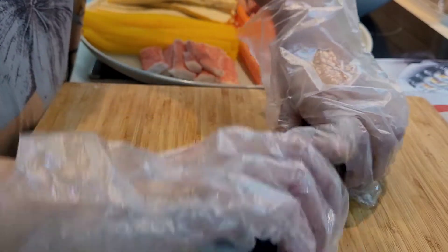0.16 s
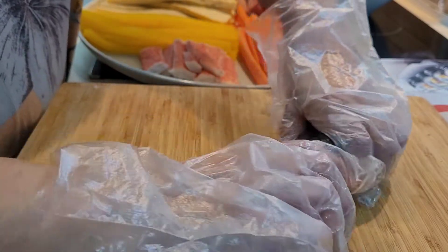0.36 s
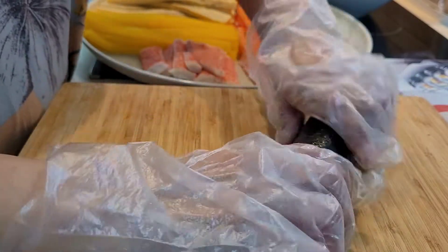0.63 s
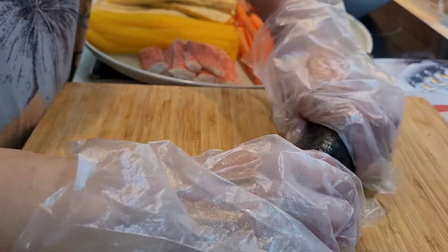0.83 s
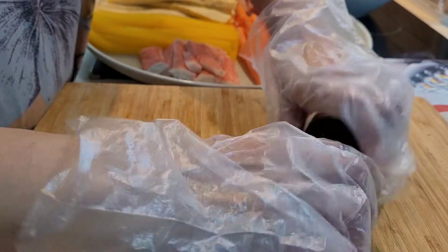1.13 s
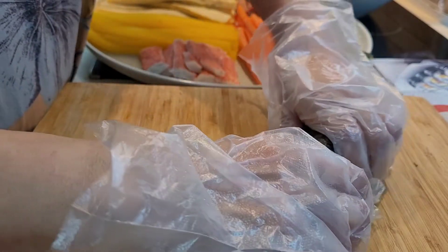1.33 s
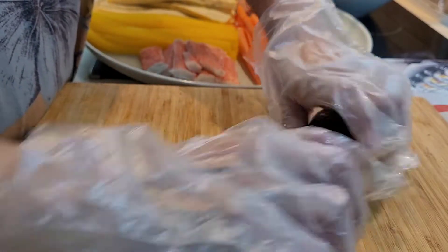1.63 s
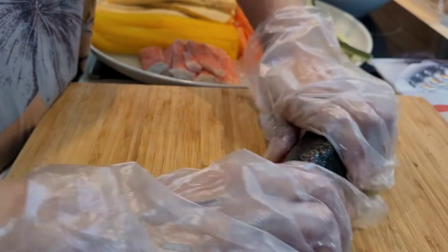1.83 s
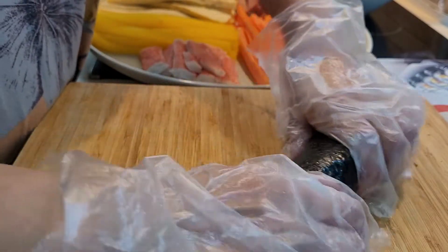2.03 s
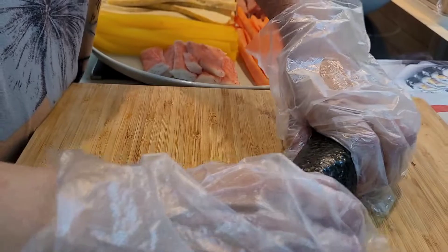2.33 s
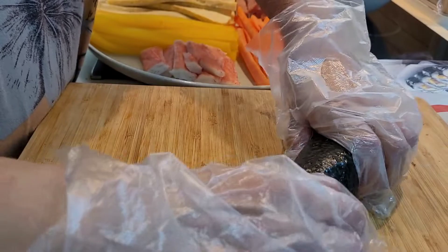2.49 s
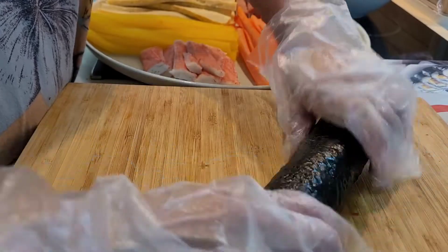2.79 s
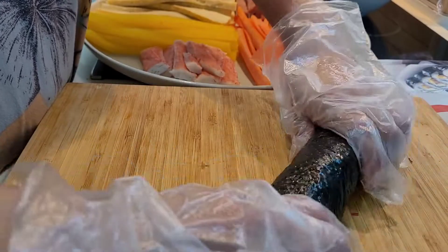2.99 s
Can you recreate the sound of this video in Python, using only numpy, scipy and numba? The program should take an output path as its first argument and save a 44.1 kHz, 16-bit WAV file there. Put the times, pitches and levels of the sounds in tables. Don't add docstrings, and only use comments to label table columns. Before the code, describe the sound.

Close stereo pickup of disposable gloves rustling brightly as hands press a food roll, swelling and easing several times a second, with stray crisp snaps, dull palm thuds and quiet kitchen rumble.

```python
import sys
import numpy as np
from scipy import signal
from scipy.fft import rfft, irfft
from scipy.io import wavfile
from scipy.ndimage import uniform_filter1d, map_coordinates
from numba import njit

SR = 44100
rng = np.random.default_rng(int(sys.argv[2]) if len(sys.argv) > 2 else 0)


def materialize(psi):
    bounded = np.clip(np.atleast_2d(psi).T, -1, 1)
    quanta = np.round(bounded * 32767).astype(np.int16)
    wavfile.write(sys.argv[1], SR, quanta)


def attenuation_scalar(level_db):
    decades = np.asarray(level_db, float) / 20
    return 10 ** decades


N = 138915

LAG_S = .00007


def shape(x, points):
    hz, db = np.array(points, float).T
    f = np.arange(N // 2 + 1) * SR / N
    gain = attenuation_scalar(np.interp(np.log(f + 1), np.log(hz + 1), db))
    return irfft(rfft(x) * gain, N)


def band(x, hz, width):
    return signal.lfilter(*signal.iirpeak(hz, hz / width, fs=SR), x)


def unit(x):
    return x / np.sqrt(np.mean(x ** 2))


def walk(rate):
    hold = int(SR / rate)
    levels = rng.standard_normal(size=512)[np.arange(N) // hold]
    return unit(uniform_filter1d(levels, hold))


@njit
def ring(at, turn, decay, size, n):
    out = np.zeros(n + 4000)
    for k in range(len(at)):
        i = int(at[k]) + 1
        d = i - at[k]
        r = np.exp(-decay[k])
        now = size[k] * np.exp(-decay[k] * d) * np.sin(turn[k] * d)
        last = size[k] * np.exp(-decay[k] * (d - 1)) * np.sin(turn[k] * (d - 1))
        c = 2 * r * np.cos(turn[k])
        for j in range(min(int(5.5 / decay[k]) + 2, 3900)):
            out[i + j] += now
            now, last = c * now - r * r * last, now
    return out[:n]


def pair(s, hz, cycles, size, pan_db, lag_s):
    turn = 2 * np.pi * hz / SR
    decay = np.log(10) * hz / SR / cycles
    ports = []
    for side in (1, -1):
        at = np.clip((s + side * lag_s / 2) * SR, 0, N - 1.)
        ports.append(ring(at, turn, decay, size * attenuation_scalar(side * pan_db / 2), N))
    return np.array(ports)


# (time of the peak [s], level [dB], time to swell by 10 dB [s], time to fade by 10 dB [s])
SQUEEZES = [(0.041, -37.2, 0.167, 0.051), (0.146, -41.0, 0.161, 0.077), (0.191, -35.7, 0.03, 0.074),
            (0.272, -41.2, 0.024, 0.076), (0.322, -39.2, 0.036, 0.069), (0.502, -40.8, 0.063, 0.152),
            (0.531, -38.6, 0.064, 0.152), (0.67, -42.4, 0.073, 0.035), (0.753, -41.8, 0.176, 0.101),
            (0.85, -46.9, 0.197, 0.103), (1.047, -39.4, 0.033, 0.165), (1.102, -40.6, 0.042, 0.148),
            (1.206, -36.5, 0.036, 0.055), (1.291, -38.3, 0.047, 0.092), (1.559, -35.5, 0.039, 0.105),
            (1.725, -40.1, 0.022, 0.192), (1.816, -40.8, 0.135, 0.022), (1.868, -45.7, 0.114, 0.21),
            (2.056, -43.4, 0.238, 0.1), (2.159, -52.2, 0.221, 0.011), (2.268, -40.1, 0.074, 0.067),
            (2.329, -37.7, 0.009, 0.071), (2.411, -43.9, 0.072, 0.051), (2.631, -34.9, 0.068, 0.055),
            (2.715, -44.6, 0.041, 0.092), (2.806, -38.2, 0.002, 0.093), (2.856, -34.1, 0.049, 0.085),
            (2.942, -38.6, 0.11, 0.081), (3.075, -40.3, 0.002, 0.096), (3.125, -36.5, 0.028, 0.327)]


def effort():
    t = np.arange(N * 1000 // SR + 1) / 1000
    power = np.zeros(len(t))
    for peak, db, rise, fall in SQUEEZES:
        drop = 10 * np.maximum((peak - t) / rise, (t - peak) / fall)
        power += attenuation_scalar(2 * (db - drop))
    return t, power


# (time [s], gain of the low creases [dB], length [s])
FOLDS = [
    (.195, 5, .025),
    (.30, 2, .04),
    (1.565, 3, .02),
    (2.855, 3.5, .03),
    (2.92, 2, .03),
]


def folds(s):
    return sum(db * np.exp(-((s - at) / length) ** 2) for at, db, length in FOLDS)


# (pitch [Hz], gain [dB])
FILM = [(350, -16), (700, -10), (1000, -10.5), (1480, -3.5), (2000, -5.5), (3300, -4), (7400, -1.5),
        (9000, -5)]
# (pitch [Hz], gain [dB])
SHEEN = [(9100, 0), (10500, 4.5), (15500, 5.5)]


def film():
    pool = 120000
    creases_per_s, rate_share = 34000, .3
    scatter_db, flutter_db = 2.3, .7
    body_share, body_hz = .07, 2000
    patchy_db, patch_hz = 1.6, 2500
    t, power = effort()
    place, chance, pitch = rng.random(size=(pool, 3)).T
    sign, length, pan, lag = rng.standard_normal(size=(pool, 4)).T
    s = place * N / SR
    flutter = walk(70)[(place * N).astype(int)]
    p = np.interp(s, t, power) * attenuation_scalar(2 * flutter_db * flutter)
    rate = creases_per_s * (p / attenuation_scalar(-74)) ** rate_share
    rate = np.minimum(rate, pool * SR / N)
    live = np.clip((rate * N / SR / pool - chance) * 20, 0, 1)

    hz = 300 + 16500 * pitch ** 1.3
    scatter = attenuation_scalar(scatter_db * np.minimum(rng.exponential(size=pool), 5.2))
    size = live * np.sign(sign) * scatter * np.sqrt(p / rate * hz)
    low = 1 / (1 + (hz / body_hz) ** 4)
    size = size * (p / attenuation_scalar(-80)) ** (body_share * low)
    patches = np.array([walk(25)[::64] for _ in range(8)])
    patch = map_coordinates(patches, [hz / patch_hz, s * SR / 64], order=1, mode="nearest")
    size = size * attenuation_scalar(folds(s) * low + patchy_db * patch)

    k = live > 0
    cycles = 1.6 * np.exp(.3 * length)
    x = pair(s[k], hz[k], cycles[k], size[k], 3 * pan[k], LAG_S + .00012 * lag[k])
    x = shape(shape(x, FILM), SHEEN)
    return unit(x) * np.sqrt(power.mean()) * attenuation_scalar(.1)


# (pitch [Hz], width [Hz], level [dB])
RUMBLE = [(66, 16, -9), (82, 30, -8), (133, 30, -2.5), (167, 30, -2), (235, 35, 0), (270, 50, -1),
          (325, 45, -5), (440, 140, -7)]


def rumble():
    total = np.zeros(N)
    for hz, width, db in RUMBLE:
        noise = rng.standard_normal(N)
        tone = unit(band(band(noise, hz, width), hz, 1.5 * width))
        total += attenuation_scalar(db + 2.2 * walk(9)) * tone
    return unit(total)


def kitchen():
    side = attenuation_scalar(-12.5) * rumble() * np.array([[1], [-1]])
    low = attenuation_scalar(-50.5) * (rumble() + side)
    deep = attenuation_scalar(-69.5) * unit(band(band(rng.standard_normal(N), 40, 16), 40, 24))
    hiss = shape(rng.standard_normal((2, N)), [(200, -10), (500, 13), (1000, 7), (3000, -2), (15000, -3)])
    return low + deep + attenuation_scalar(-62) * unit(hiss)


# (time [s], level [dB])
THUDS = [(.03, -46), (.20, -48), (.26, -50), (.67, -48), (.75, -52), (.83, -51), (.95, -52), (1.09, -47),
         (1.22, -53), (1.46, -52), (1.55, -53), (1.8, -56), (2.16, -51), (2.24, -52), (2.33, -52),
         (2.58, -47), (2.86, -47), (3.13, -54)]


def board():
    thud_hz, rise_s, t60_s = 66, .03, .42
    d = np.arange(SR // 2) / SR
    out = np.zeros(N + 2 * SR)
    swell = (1 - np.exp(-(d / rise_s) ** 2)) * attenuation_scalar(-60 * d / t60_s)
    for s, db in THUDS:
        detune, phase = rng.random(size=2)
        hz = thud_hz * (1 + .12 * (detune - .5))
        i = int((s - rise_s) * SR) + SR
        out[i:i + len(d)] += attenuation_scalar(db) * swell * np.sin(2 * np.pi * (hz * d + phase))
    return attenuation_scalar(6) * out[SR:SR + N] * np.array([[.87], [1.13]])


# (time [s], peak level [dB], pitch [Hz], left minus right [dB])
SNAPS = [(0.9434, -42, 6800, -1.0), (0.9924, -39, 10300, -2.0), (1.0231, -33, 6900, -1.0),
         (1.5065, -36, 3190, -2.0), (1.722, -30, 4090, 1.0), (2.2223, -33, 5330, -1.0),
         (2.3256, -30, 7580, -1.0), (2.4084, -32, 2420, -1.5), (2.4844, -41, 4480, -2.0),
         (2.5094, -41, 4260, -2.5), (2.5204, -38, 6750, -1.0), (2.806, -28, 7620, -0.5),
         (2.9836, -25, 1460, -4.0), (3.0619, -38, 1420, 0.0), (3.0734, -33, 7430, 2.0),
         (3.0764, -29, 7320, 0.0)]


def snaps():
    s, db, hz, pan = np.repeat(np.array(SNAPS), 10, axis=0).T
    detune, delay, level, lag = rng.standard_normal(size=(len(s), 4)).T
    near = hz * np.exp(.15 * detune)
    broad = np.clip(7000 * np.exp(.5 * detune), 2500, 15000)
    tick = np.where(np.arange(len(s)) % 2, near, broad)
    size = np.sign(delay) * attenuation_scalar(db - 3 + 2.5 * level) * np.minimum(tick / 6000, 1) ** .55
    at = s + .001 + .0018 * np.abs(delay) * np.minimum(hz / 4000, 1)
    x = pair(at, tick, 2.5 + 0 * s, size, pan, LAG_S + .00012 * lag)
    return shape(x, [(400, -14), (1200, 0), (4000, 1.5)])


def room(near):
    t60_s, top_hz = .08, 12000
    t = np.arange(int(.25 * SR)) / SR
    tail = rng.standard_normal((2, len(t))) * attenuation_scalar(-60 * t / t60_s) * (t > .0008)
    tail = signal.lfilter(*signal.butter(1, top_hz, fs=SR), tail)
    tail = tail / np.sqrt((tail ** 2).sum(axis=1, keepdims=True))
    return attenuation_scalar(-10) * signal.fftconvolve(near, tail, axes=1)[:, :N]


def scene():
    near = film() + snaps()
    return near + room(near) + board() + kitchen()


# (pitch [Hz], left minus right [dB])
PORTS = [(40, -4.5), (200, -1), (1300, -2), (3500, -.6), (5500, -2.5), (7500, -5.5), (8400, 1), (14000, 2)]


def microphone(dry):
    left = shape(dry[0], [(hz, db / 2) for hz, db in PORTS])
    right = shape(dry[1], [(hz, -db / 2) for hz, db in PORTS])
    return np.array([left, right])


def band_limit(x):
    return signal.sosfilt(signal.butter(12, 16700, fs=SR, output="sos"), x)


def record(dry):
    top_hz = 15600
    mix = shape(microphone(dry), [(top_hz, 0), (1.02 * top_hz, -70)])
    return band_limit(mix)


dry = scene()
out = record(dry)
materialize(out)
```